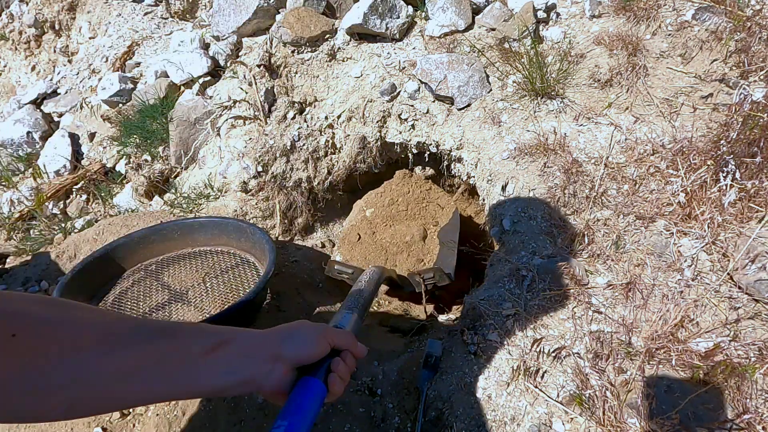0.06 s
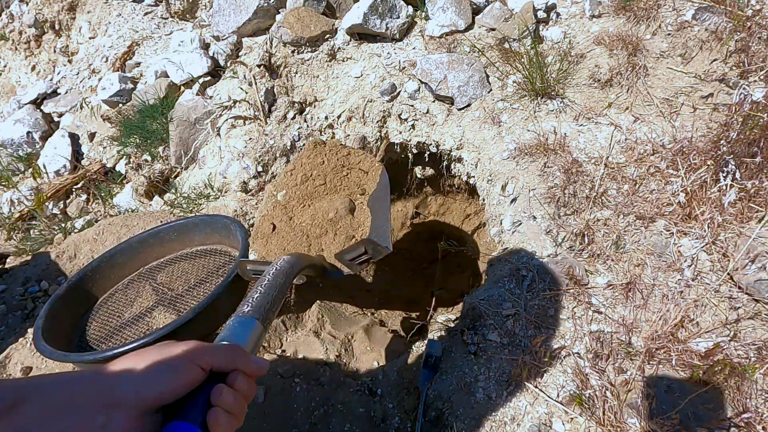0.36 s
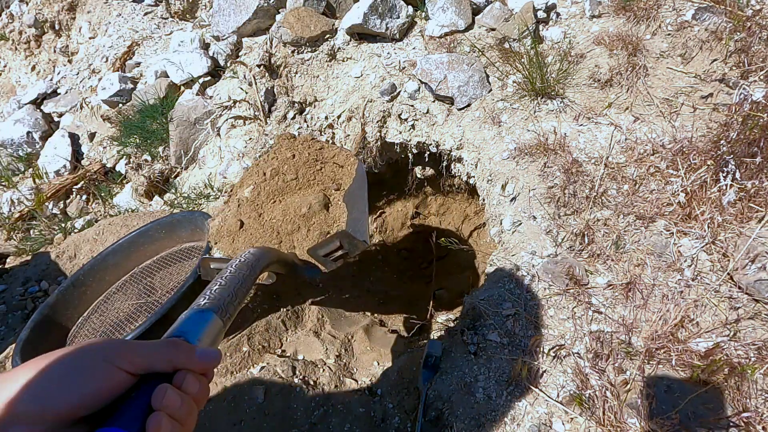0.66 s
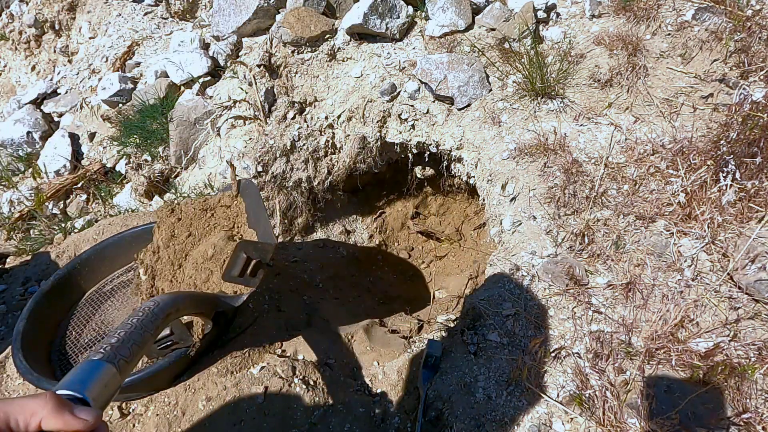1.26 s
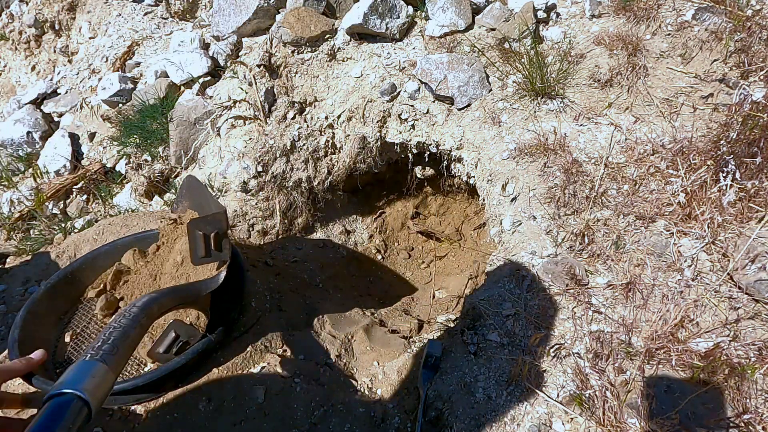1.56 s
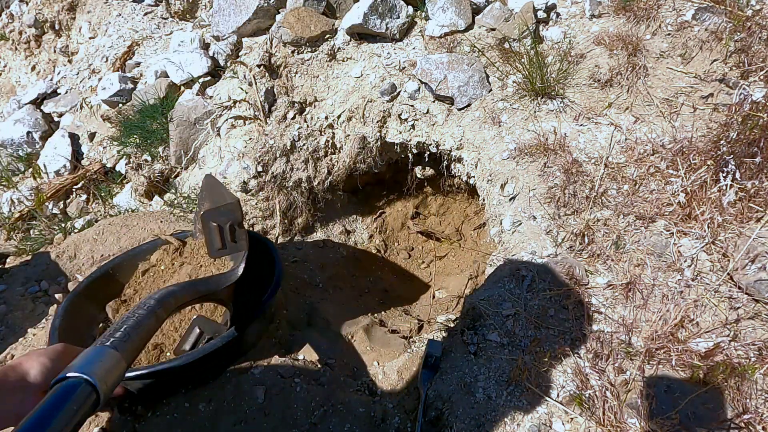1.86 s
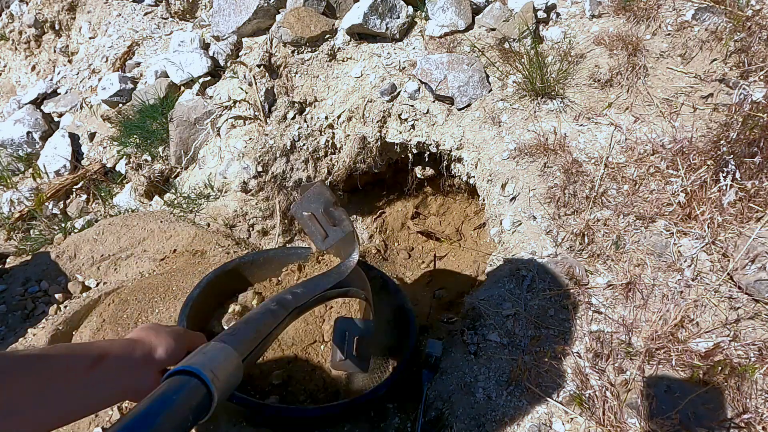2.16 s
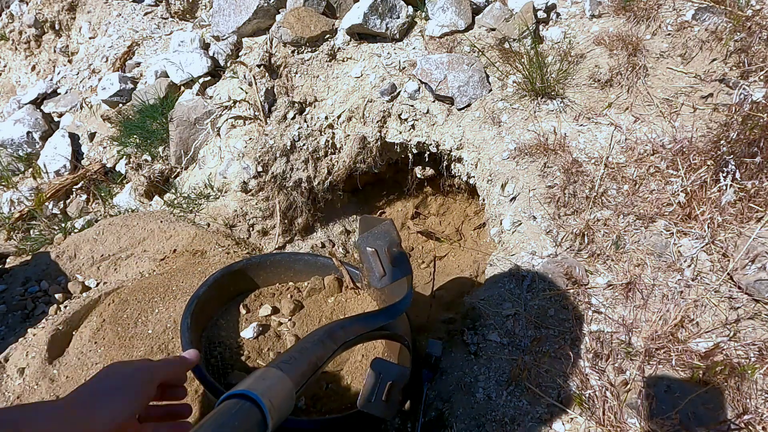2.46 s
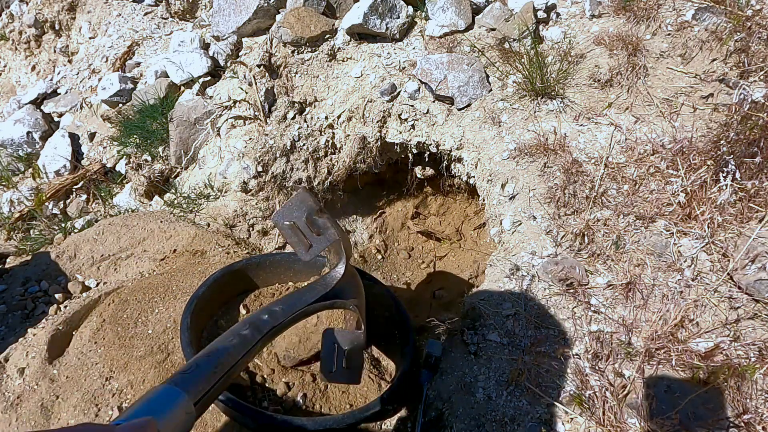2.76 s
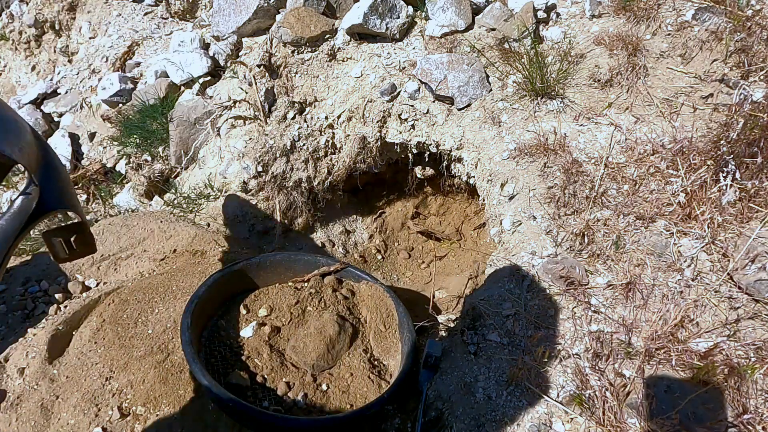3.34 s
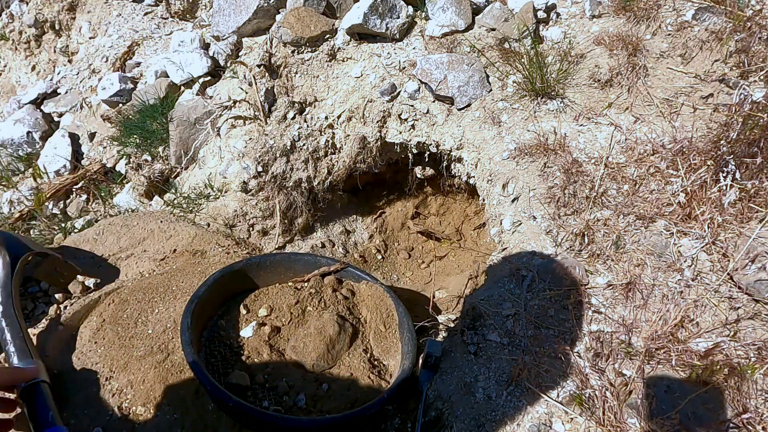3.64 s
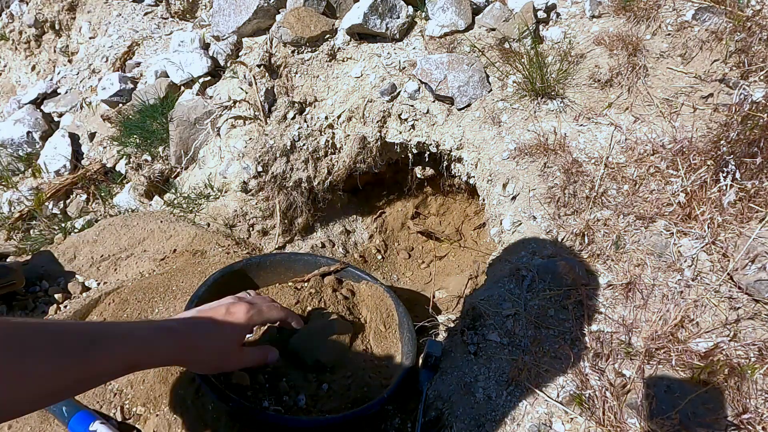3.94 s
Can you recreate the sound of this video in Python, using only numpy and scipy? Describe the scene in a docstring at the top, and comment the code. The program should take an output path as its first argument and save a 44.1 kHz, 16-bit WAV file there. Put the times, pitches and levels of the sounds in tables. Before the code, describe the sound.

Dry dirt pours off a shovel into a plastic sieve, pebbles knocking and sand hissing. The steel blade then scrapes and clinks a few times. Outdoors, with wind rumbling on the microphone from halfway on.

```python
"""A steel shovel carries dry dirt over a plastic sieve outdoors: pebbles knock into the pan, then the
load pours in as pattering crumbs and hissing sand. The blade is drawn out, grit rasping on it and blows
ringing its modes, and is dropped ringing on the ground. Wind buffets the microphone with a low rumble,
mostly from halfway on, over quiet open air."""
import sys
import numpy as np
from scipy import signal
from scipy.fft import rfft, irfft
from scipy.io import wavfile
from scipy.ndimage import uniform_filter1d

SR = 44100
rng = np.random.default_rng(int(sys.argv[2]) if len(sys.argv) > 2 else 0)


def unload_wav(signal):
    """Save mono or channel-first audio to the path in sys.argv[1] as 16-bit WAV at rate SR, clipped to [-1, 1]."""
    wavfile.write(
        sys.argv[1],
        SR,
        np.round(np.clip(np.atleast_2d(signal).T, -1, 1) * 32767).astype(np.int16),
    )


N = 176400
T = np.arange(N) / SR

# Spectrum of the plastic pan. Each row: frequency in Hz, level in dB.
PAN_SPECTRUM = [(100, -44), (350, -6), (720, -9), (980, 10), (1300, 8), (2050, 6.5), (2800, -15),
                (16000, -54)]


def amp(db):
    """Decibels to gain."""
    return 10 ** (np.asarray(db) / 20)


def unit(x):
    """Scale to rms 1."""
    return x / np.sqrt(np.mean(x ** 2) + 1e-20)


def add(mix, start_s, sound):
    """Mix a sound in at start_s."""
    part = mix[max(round(start_s * SR), 0):][:len(sound)]
    part += sound[:len(part)]


def spectrum_db(points, hz):
    """Interpolate (Hz, dB) points on a log-frequency axis."""
    points_hz, db = np.transpose(points)
    return np.interp(np.log(hz + 1), np.log(points_hz), db)


def envelope(table, column=1):
    """Gain over time from a dB column; column 0 is seconds."""
    rows = np.array(table)
    return amp(np.interp(T, rows[:, 0], rows[:, column]))


def balance(lean_db):
    """Left and right gains, lean_db being left minus right."""
    return amp(lean_db * np.array([[.5], [-.5]]))


def contact_db(hz, centre_hz, half_width_oct):
    """How strongly a contact drives each frequency: a bell around centre_hz."""
    return -20 * np.log10(1 + (np.log2((hz + 1) / centre_hz) / half_width_oct) ** 4)


def colour(x, points, tilt_db=lambda hz: 0, size=4096):
    """Apply a minimum-phase, unit-energy filter with the given spectrum."""
    hz = abs(np.fft.fftfreq(size, 1 / SR))
    log_gain = np.log(amp(spectrum_db(points, hz) + tilt_db(hz)))
    response = np.exp(np.conj(signal.hilbert(log_gain)))
    taps = np.fft.ifft(response).real[:size // 2]
    return signal.fftconvolve(x, taps / np.linalg.norm(taps))[:len(x)]


def swell(t, peak_s):
    """Rise to 1 at peak_s, then decay."""
    return t / peak_s * np.exp(1 - t / peak_s)


def grains(per_s, spread_db, size=N):
    """Random clicks: many small, a few large."""
    strength = amp(spread_db * np.minimum(rng.exponential(1, size), 4))
    return unit(strength * rng.choice([-1, 1], size) * (rng.random(size) < per_s / SR))


def spray(per_band_per_s, spread_db, size=N):
    """Grains of seven sizes, each ticking in its own band at its own moments."""
    edges_hz = np.geomspace(200, 16000, 8)
    bands = [signal.butter(2, pair, "bandpass", fs=SR, output="sos")
             for pair in zip(edges_hz, edges_hz[1:])]
    return unit(sum(signal.sosfilt(band, grains(per_band_per_s, spread_db, size)) for band in bands))


def open_air(level_db=-60):
    """Steady outdoor noise, partly common to both sides."""
    # Each row: frequency in Hz, level in dB.
    air_spectrum = [(170, -4.5), (300, -9.5), (700, -22.5), (2800, -25.5), (7000, -24), (15000, -43)]
    noise = np.array([colour(white, air_spectrum) for white in rng.standard_normal((3, N))])
    return amp(level_db) * unit(noise[:2] + noise[2])


def wind(buffet_hz=21.7, crossover_hz=130, rumble_depth_db=2, puff_depth_db=5.5):
    """Lumpy low turbulence follows the gusts; each buffet brings a puff of higher rumble."""
    # Gusts on the microphone. Each row: time in seconds, level in dB.
    gusts = [(.4, -66), (.5, -49.5), (.75, -60), (.88, -38.5), (.98, -34), (1.1, -58), (1.39, -58),
             (1.48, -37), (1.81, -42.5), (2.01, -19.5), (2.63, -21.5), (2.87, -26), (2.97, -19),
             (3.11, -25.5), (3.2, -19), (3.64, -26.5), (3.75, -41.5), (3.79, -23), (4, -23)]
    # Turbulence. Each row: frequency in Hz, level in dB.
    eddy_spectrum = [(10, -7.5), (35, -3), (68, 0.5), (100, -7.5), (160, -12.5), (400, -35.5), (8000, -100)]
    hz = np.fft.rfftfreq(N, 1 / SR)
    eddies = rfft(rng.standard_normal(N)) * amp(spectrum_db(eddy_spectrum, hz))
    buffet_band = hz / buffet_hz * np.exp(-(hz / buffet_hz) ** 2)
    buffets = np.minimum(unit(irfft(rfft(rng.standard_normal(N)) * buffet_band, N)), 2)
    lowpass = np.exp(-(hz / crossover_hz) ** 2)
    rumble = irfft(eddies * lowpass, N) * unit(amp(rumble_depth_db * buffets))
    puffs = irfft(eddies * (1 - lowpass), N) * unit(amp(puff_depth_db * buffets))
    return unit(rumble + puffs) * envelope(gusts)


def ground_scatter(x, level_db=-7.5, t60_s=.025):
    """Add brief scatter from ground and rocks, different on each side."""
    t = T[:SR // 6]
    taps = rng.standard_normal((2, len(t))) * amp(-60 * t / t60_s) * (t > .001)
    scatter = signal.fftconvolve(x[None], taps / np.linalg.norm(taps[0]), axes=1)[:, :N]
    return x + amp(level_db) * scatter


def steel_ring(centre_hz, half_width_oct, damping_per_s, flatness):
    """The shovel's strong modes and many weak ones; touching dirt damps and detunes them."""
    # Each row: frequency in Hz, level in dB struck on the edge, level in dB struck flat.
    strong_modes = [(492,-6,-3), (626,-15,-8), (753,-7,-10), (1114,-24,-14), (1231,-7,-11), (1561,-9,-22),
                    (1724,-2,2), (1776,-6,-25), (1989,-20,-5), (2256,-4,-6), (2460,-8,-20), (2513,-17,-6),
                    (2815,-6,-13), (2908,-6,-20), (3072,-14,-17), (3210,-18,-16), (3403,-4,-20),
                    (3431,-12,-4), (3623,-3,-12), (4063,-24,-6), (4288,-12,-22), (4549,-11,-10),
                    (4938,-19,-8), (5088,-13,-11), (5695,-9,-28), (6165,-3,-26), (6340,-5,-14),
                    (6920,-6,-24), (7241,-2,-20), (7980,-9,-30)]
    weak_modes = [(hz, -26, -26) for hz in rng.uniform(600, 10000, 32)]
    t60_at_1khz_s, long_ringing_hz = .98, (2460, 3403)
    out, t = np.zeros(SR), T[:SR]
    for hz, edge_db, flat_db in strong_modes + weak_modes:
        t60_s = t60_at_1khz_s * (1000 / hz) ** .92 * (2 if hz in long_ringing_hz else 1)
        decay = np.exp(-t * (np.log(1000) / t60_s + damping_per_s))
        detuned_hz = hz * (1 + .00035 * damping_per_s * rng.uniform(-.83, 1))
        mode_db = edge_db * (1 - flatness) + flat_db * flatness
        gain = amp(mode_db + contact_db(detuned_hz, centre_hz, half_width_oct))
        out += gain * decay * np.sin(2 * np.pi * (detuned_hz * t + rng.random()))
    return out


def blade_scrapes():
    """Grit slips under the blade, rasping and driving its damped modes."""
    # Each row: start and length in seconds, rasp and ring in dB, centre in Hz, damping per second.
    strokes = [(1.806, 0.11, -40.5, -48, 4600, 100), (2.263, 0.017, -36, -35.5, 4570, 70),
               (2.367, 0.1, -31.5, -32, 2360, 103), (2.407, 0.047, -53, -33, 5440, 42),
               (2.762, 0.032, -45, -52, 3580, 8.9), (2.846, 0.04, -40.5, -45.5, 3320, 18),
               (2.892, 0.054, -33.5, -37.5, 3200, 98), (2.927, 0.091, -40.5, -41.5, 1210, 170),
               (2.979, 0.019, -49, -39, 3800, 68), (3.28, 0.11, -45, -43.5, 7500, 170),
               (3.894, 0.039, -37, -41.5, 4280, 36)]
    # Steel rubbing on dirt. Each row: frequency in Hz, level in dB.
    rasp_spectrum = [(1100, 3.5), (2400, -2), (7500, -8.5), (10500, -20), (16000, -19)]
    out, t = np.zeros(N), T[:SR // 2]
    for start_s, length_s, rasp_db, ring_db, centre_hz, damping_per_s in strokes:
        arch = np.sin(np.pi * np.minimum(t / length_s, 1))
        slips = arch * spray(per_band_per_s=900, spread_db=5.5, size=len(t))
        ring = steel_ring(centre_hz, half_width_oct=1, damping_per_s=damping_per_s, flatness=0)
        add(out, start_s, amp(rasp_db) * colour(slips, rasp_spectrum))
        add(out, start_s, amp(ring_db) * signal.fftconvolve(slips, ring / np.linalg.norm(ring)))
    return out


def blade_clinks():
    """Blows on the shovel: a crack, then the ring."""
    # Each row: start in seconds, ring in dB, centre in Hz, half-width in octaves, damping per second,
    # flatness (0 edge-on, 1 flat), crack in dB, crack decay in seconds.
    blows = [(2.8317, -20, 8300, 1.29, 99, 0.16, -16.5, 0.0015),
             (2.8353, -41, 3060, 0.092, 93, 0.7, -26, 0.0027),
             (2.98, -34, 1600, 1.25, 3.5, 0.58, -55, 0.0049),
             (3.008, -30, 3020, 1.5, 7.5, 0.45, -28, 0.0062), (3.33, -24.5, 7700, 0.88, 9, 0, -23, 0.0082),
             (3.8955, -23, 2060, 1.36, 16.5, 0.83, -6.5, 0.0018),
             (3.956, -28, 1480, 1.29, 1, 1, -48, 0.0078)]
    # A blow on steel. Each row: frequency in Hz, level in dB.
    crack_spectrum = [(400, 39.5), (900, 12.5), (1800, 10), (7700, -2), (11000, -5), (16000, -36)]
    out, t = np.zeros(N), T[:SR // 4]
    for start_s, ring_db, centre_hz, half_width_oct, damping_per_s, flatness, crack_db, crack_s in blows:
        add(out, start_s, amp(ring_db) * steel_ring(centre_hz, half_width_oct, damping_per_s, flatness))
        burst = rng.standard_normal(len(t)) * np.exp(-t / crack_s)
        crack = colour(burst, crack_spectrum, lambda hz: contact_db(hz, centre_hz, half_width_oct))
        add(out, start_s, amp(crack_db) * crack)
    return out


def dirt_pour(clump_depth_db=3.5, clump_s=.018):
    """Crumbs patter on the pan while fine sand runs in clumps off the blade and through the mesh."""
    # Falling dirt. Each row: time in seconds, patter in dB, sand hiss in dB.
    flow = [(.1, -71, -99), (.56, -69.5, -57.5), (.62, -37.5, -47.5), (.69, -63.5, -79),
            (.84, -54.5, -50.5), (1.0, -51.5, -61.5), (1.07, -39, -42), (1.19, -52, -61.5),
            (1.36, -57.5, -60), (1.52, -39, -38), (1.62, -38.5, -50), (1.85, -45, -40), (1.98, -53.5, -47),
            (2.18, -59, -45.5), (2.44, -29.5, -41), (2.53, -65, -49.5), (2.67, -85, -62.5),
            (2.72, -74, -63.5), (3.46, -69, -62), (3.65, -62, -49.5), (3.76, -103, -63), (3.88, -78, -48.5),
            (3.97, -87, -51)]
    # Running sand. Each row: frequency in Hz, level in dB.
    sand_spectrum = [(650, -10.5), (1050, -3), (7500, -13.5), (10000, -24.5), (16000, -34.5)]
    crumbs = unit(grains(per_s=200, spread_db=5.5) + spray(per_band_per_s=400, spread_db=5.5))
    sand = .5 * grains(per_s=1400, spread_db=4.5) + spray(per_band_per_s=1400, spread_db=4.5)
    clumps = unit(uniform_filter1d(rng.standard_normal(N), round(clump_s * SR)))
    sand = unit(sand * amp(clump_depth_db * clumps))
    patter = colour(crumbs * envelope(flow, column=1), PAN_SPECTRUM)
    hiss = colour(sand * envelope(flow, column=2), sand_spectrum)
    return patter + hiss


def pebble_knocks():
    """Each stone gives a dead plastic knock, a short ring of the pan, a spray of grit and a thud."""
    # Pebbles and clods landing in the sieve. Each row: start in seconds, gain in dB, pitch in Hz,
    # further gains for grit and thud in dB.
    landings = [(.460, -20, 1540, -9, -6), (0.465, -24.5, 1350, -13.5, -4), (0.557, -25.5, 1450, -6, -6.5),
                (.591, -30.5, 1400, -4.5, -4), (.724, -30.5, 1060, -13.5, -26),
                (.774, -41.5, 1230, 1.5, -24), (.895, -37, 1250, -1, -34), (0.9734, -14, 1130, -14.5, -60),
                (1.0157, -30, 1010, -16, -34), (1.032, -18.5, 1430, 0, -31), (1.058, -23.5, 1450, 6.5, -38),
                (1.3045, -17, 1910, 1.5, -22), (1.374, -24.5, 1340, -7, -16), (1.42, -24, 1300, -7, -23),
                (1.433, -10, 1020, -17, -6.5), (1.458, -27, 1610, 1, 0.5), (1.47, -16, 1250, 3, 7),
                (1.498, -22.5, 1950, -8, -3.5), (1.512, -22, 1370, -4, -8), (1.528, -16, 1040, -11.5, -5.5),
                (1.58, -30.5, 1230, 4, -17), (1.675, -36, 1110, -8, -25), (1.945, -29, 1350, -0.5, -4),
                (2.013, -25, 1370, -18, -29), (2.155, -22.5, 990, -32, -3), (2.178, -27, 1690, -17, -27),
                (2.144, -24.5, 1880, -8.5, -31), (2.2055, -30.5, 5900, 4, -22), (2.287, -28, 493, -25, -24),
                (2.745, -35, 380, -36, 8.5)]
    # Crumbling grit. Each row: frequency in Hz, level in dB.
    grit_spectrum = [(600, -12), (1100, 9.5), (5500, -1), (8000, -8.5), (11000, -16.5), (16000, -30)]
    impact_db, ring_db, ring_t60_s = 16, -4.5, .035
    thud_hz, rim_hz, thud_peak_s = 308, 499, .0031
    out, t = np.zeros(N), T[:4096]
    for start_s, gain_db, pitch_hz, grit_db, thud_db in landings:
        ring_noise, grit_noise, roughness = rng.standard_normal((3, len(t)))
        blow = amp(impact_db) * (t == 0) + amp(ring_db - 60 * t / ring_t60_s) * ring_noise
        knock = colour(blow, PAN_SPECTRUM, lambda hz: contact_db(hz, pitch_hz, half_width_oct=.56))
        crumble = swell(t, peak_s=.002) * unit(grit_noise * abs(roughness) ** .5)
        grit = .5 * colour(crumble, grit_spectrum)
        body = np.sin(2 * np.pi * thud_hz * t) + np.sin(np.pi * thud_hz * t)  # with the octave below
        rim = np.sin(2 * np.pi * rim_hz * t)
        thud = .5 * (swell(t, thud_peak_s) * body + swell(t, thud_peak_s / 2) * rim)
        add(out, start_s, amp(gain_db) * (knock + amp(grit_db) * grit + amp(thud_db) * thud))
    return out


def scene():
    """Open air, wind that strikes the right port harder, dirt and shovel."""
    background = open_air() + wind() * balance(lean_db=-3.5)
    shovelling = pebble_knocks() + dirt_pour() + blade_clinks() + blade_scrapes()
    return background + ground_scatter(shovelling)


def record(dry):
    """Two microphone ports of unequal colour, then the band limit."""
    # Port imbalance. Each row: frequency in Hz, left minus right in dB.
    port_lean = [(400, -3), (8000, 2), (14000, 0)]
    cutoff_hz = 15800
    lean_db = spectrum_db(port_lean, np.fft.rfftfreq(2 * N, 1 / SR))
    ports = irfft(rfft(dry, 2 * N) * balance(lean_db))[:, :N]
    lowpass = signal.firwin(255, cutoff_hz, window=("kaiser", 9), fs=SR)
    return signal.oaconvolve(ports, lowpass[None], "same")


dry = scene()
out = record(dry)
unload_wav(out)
```